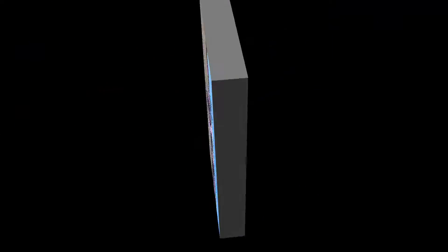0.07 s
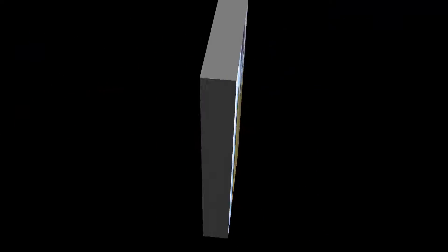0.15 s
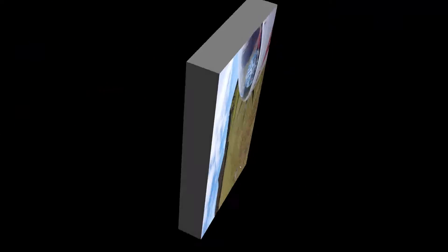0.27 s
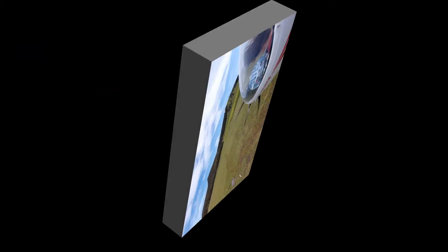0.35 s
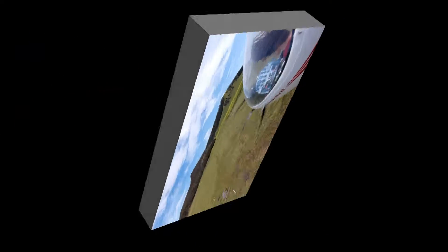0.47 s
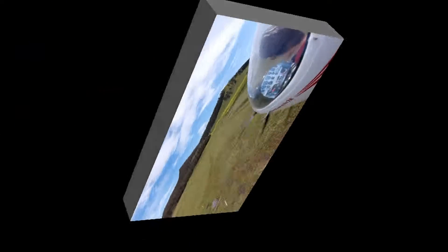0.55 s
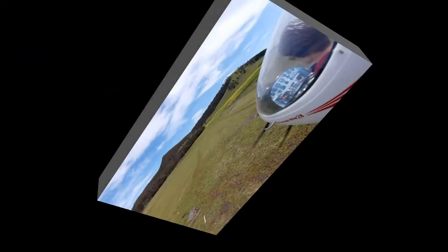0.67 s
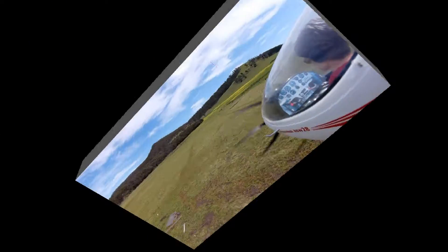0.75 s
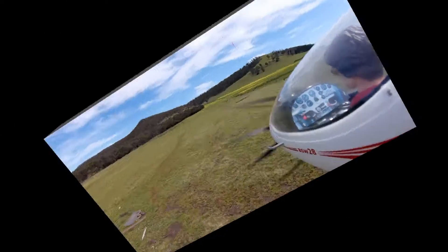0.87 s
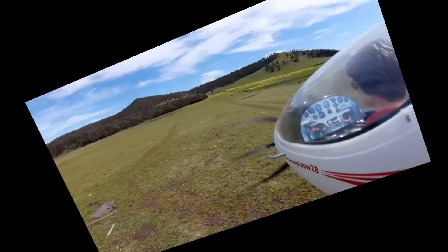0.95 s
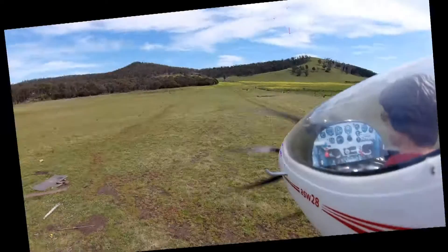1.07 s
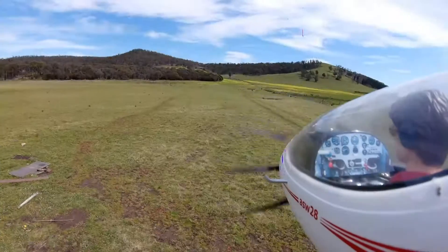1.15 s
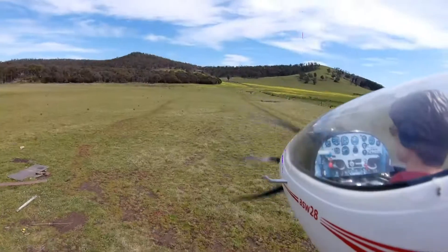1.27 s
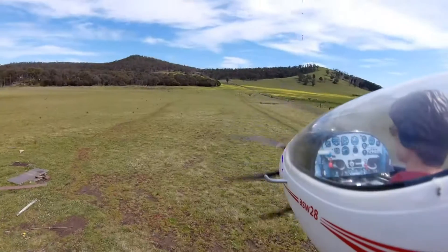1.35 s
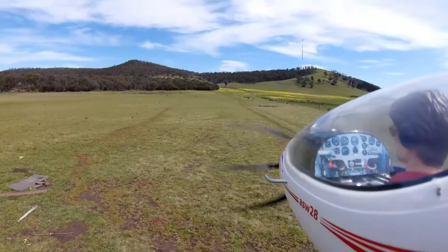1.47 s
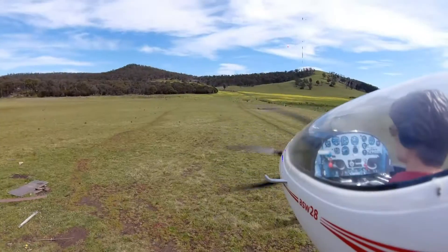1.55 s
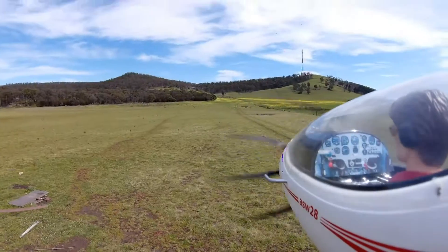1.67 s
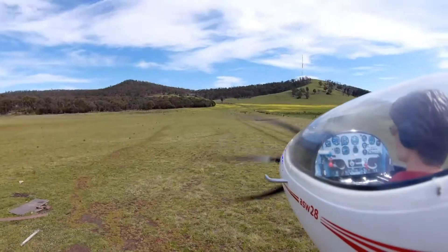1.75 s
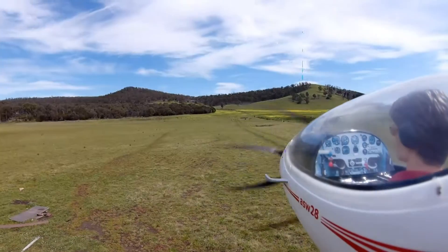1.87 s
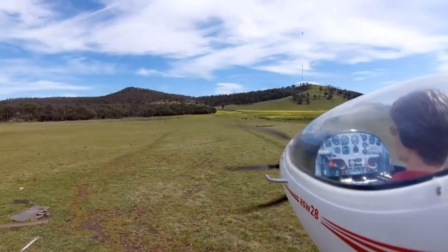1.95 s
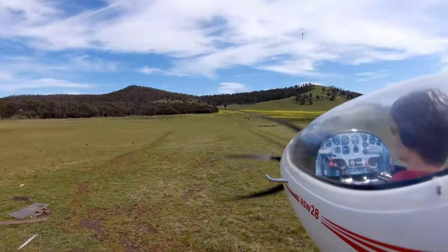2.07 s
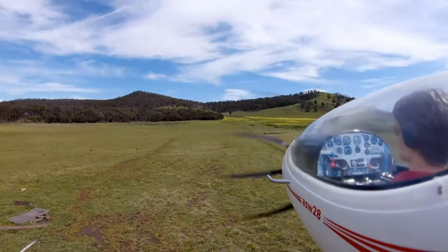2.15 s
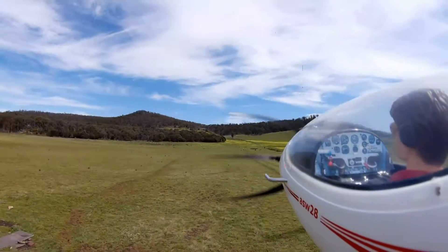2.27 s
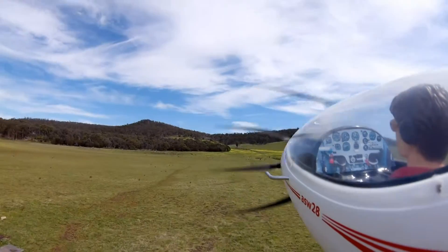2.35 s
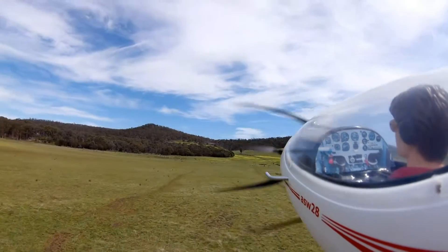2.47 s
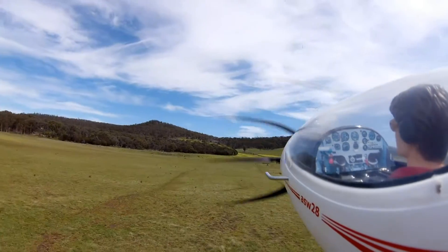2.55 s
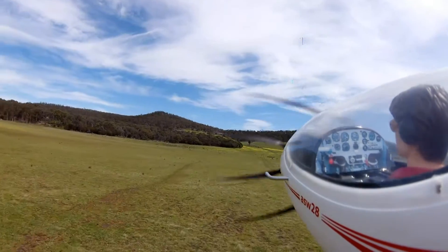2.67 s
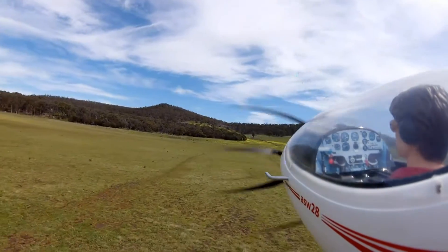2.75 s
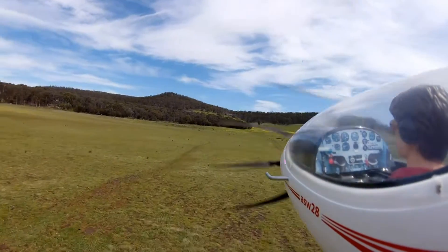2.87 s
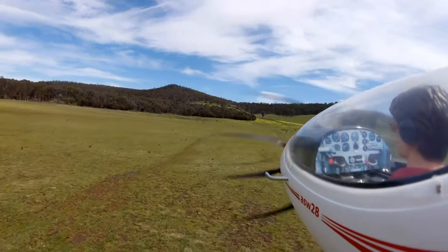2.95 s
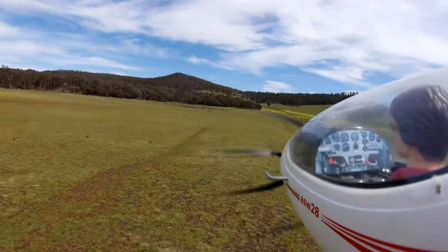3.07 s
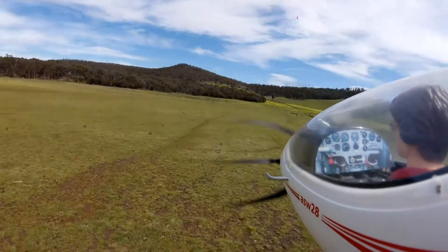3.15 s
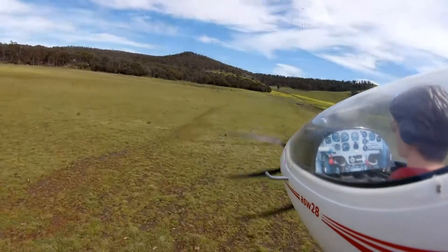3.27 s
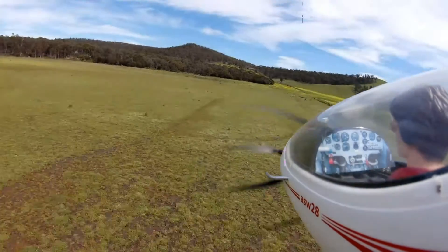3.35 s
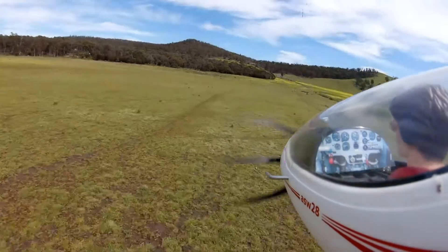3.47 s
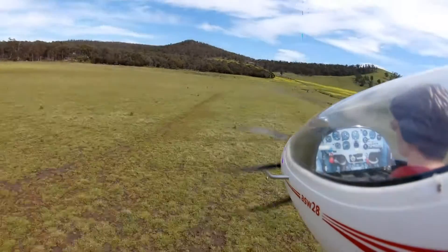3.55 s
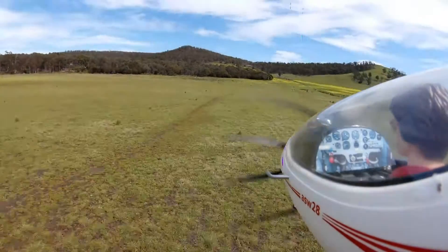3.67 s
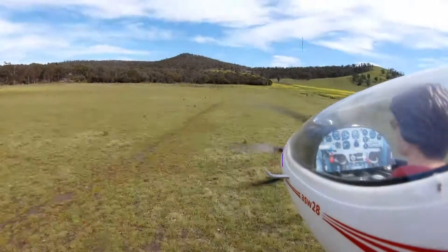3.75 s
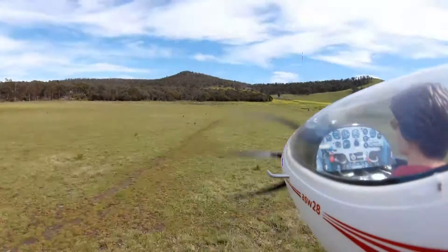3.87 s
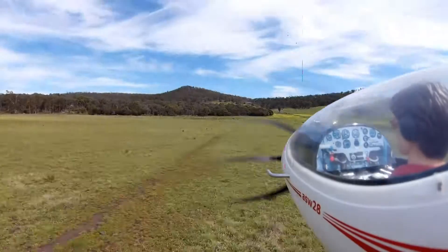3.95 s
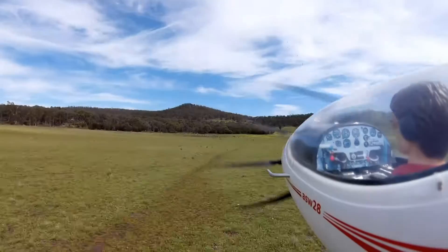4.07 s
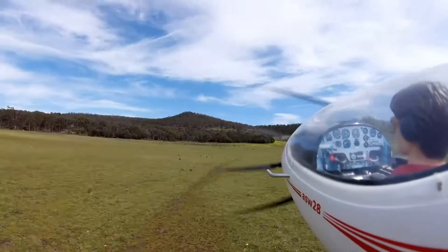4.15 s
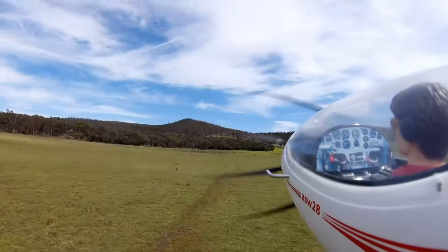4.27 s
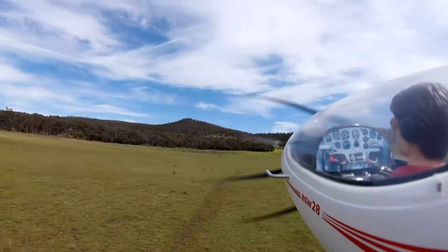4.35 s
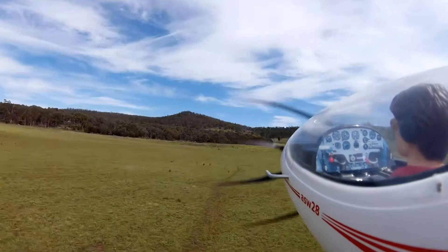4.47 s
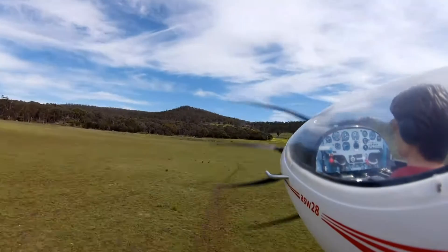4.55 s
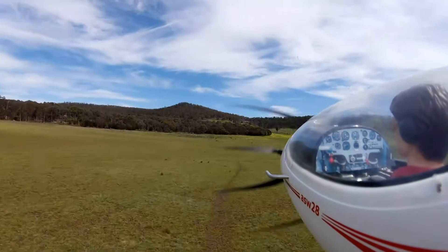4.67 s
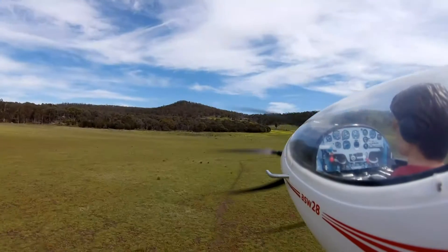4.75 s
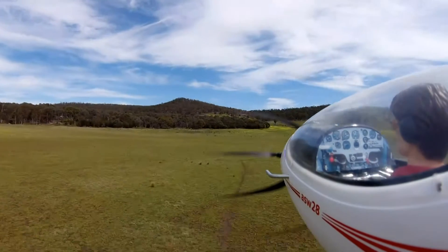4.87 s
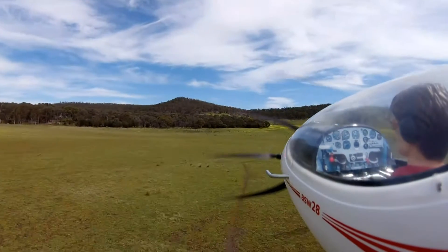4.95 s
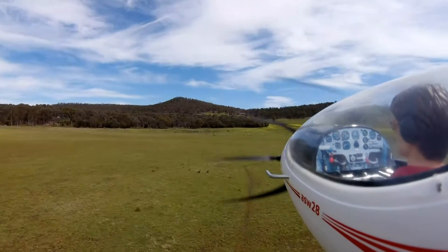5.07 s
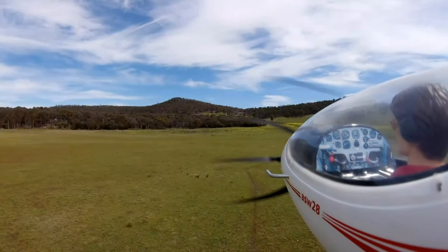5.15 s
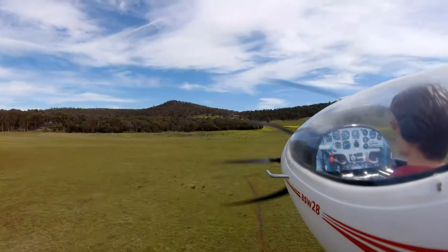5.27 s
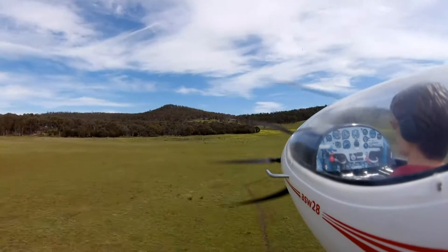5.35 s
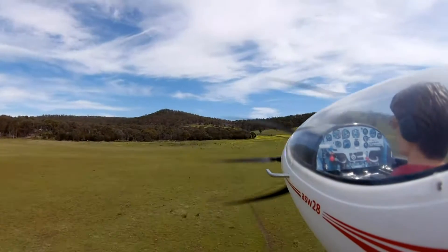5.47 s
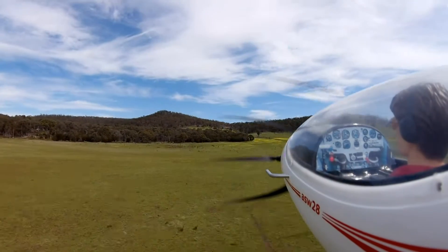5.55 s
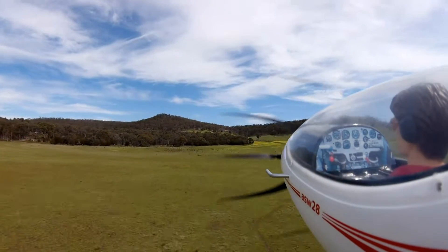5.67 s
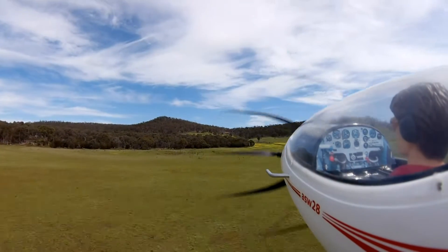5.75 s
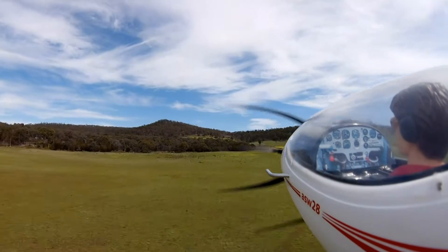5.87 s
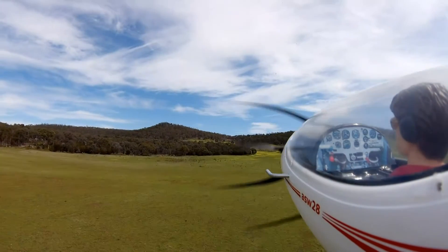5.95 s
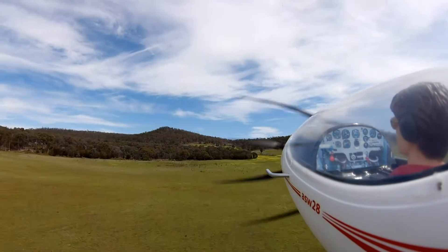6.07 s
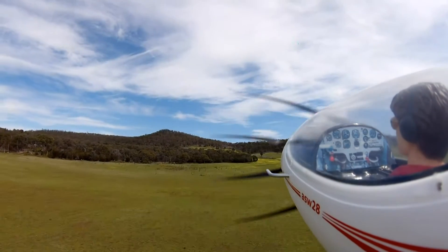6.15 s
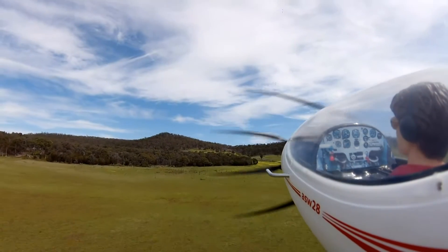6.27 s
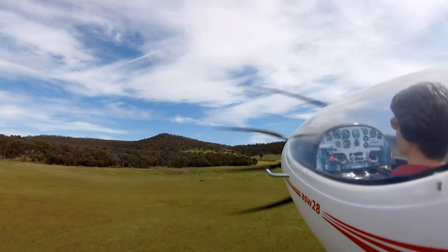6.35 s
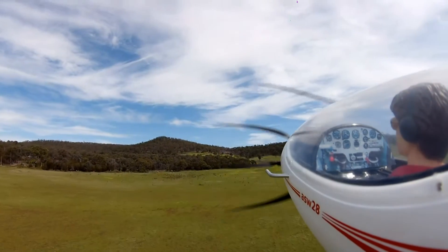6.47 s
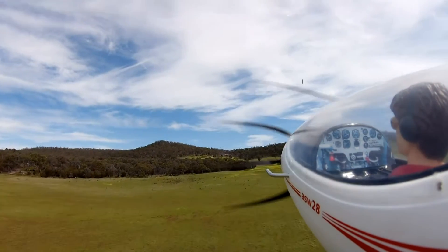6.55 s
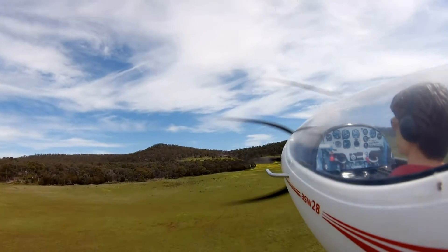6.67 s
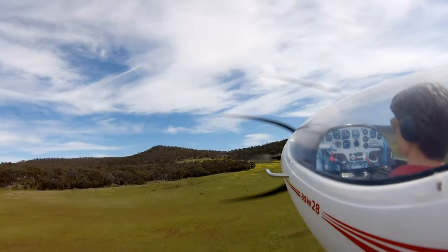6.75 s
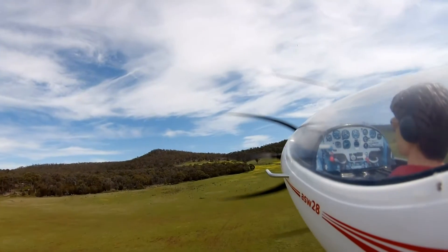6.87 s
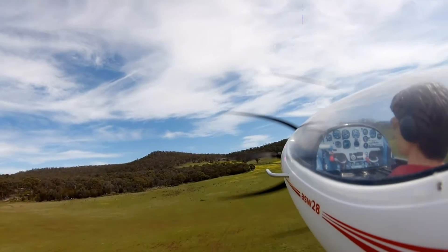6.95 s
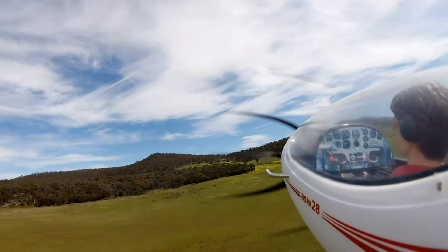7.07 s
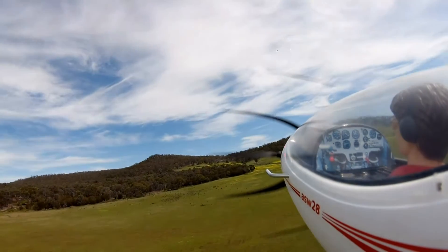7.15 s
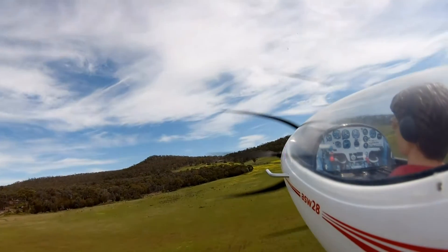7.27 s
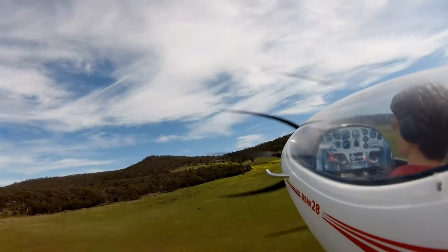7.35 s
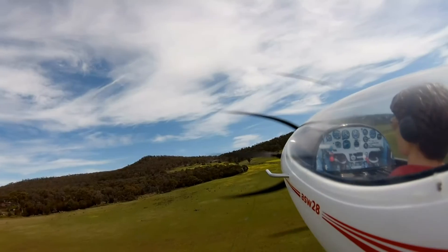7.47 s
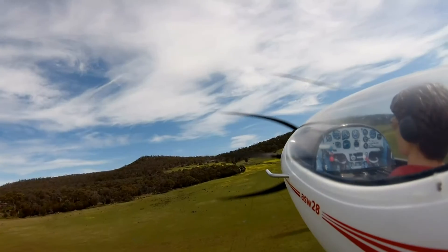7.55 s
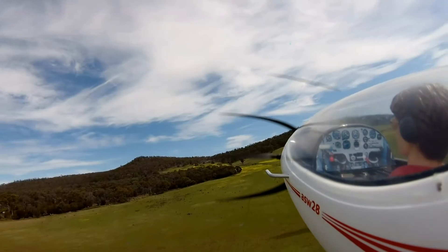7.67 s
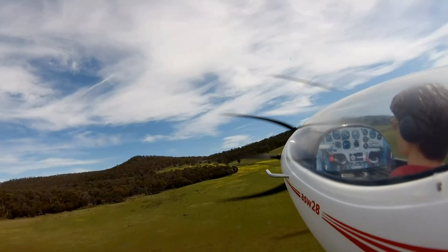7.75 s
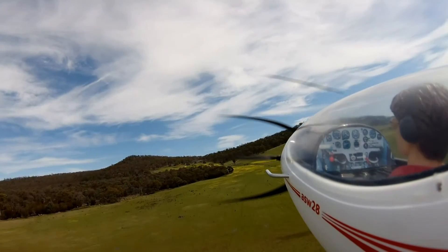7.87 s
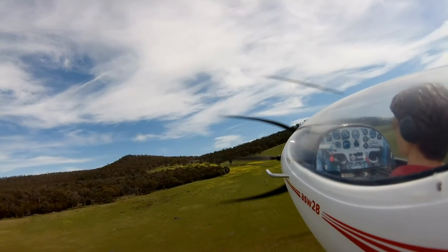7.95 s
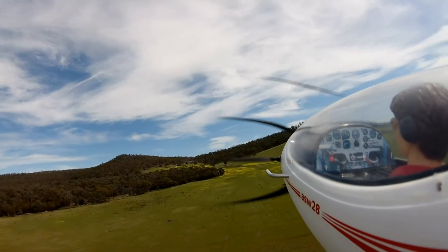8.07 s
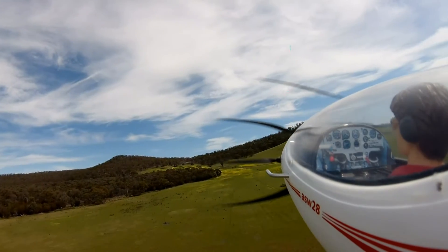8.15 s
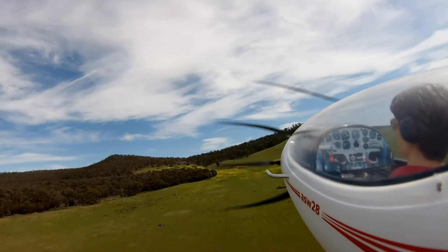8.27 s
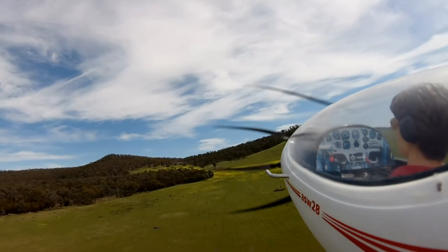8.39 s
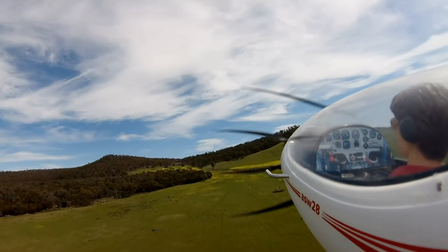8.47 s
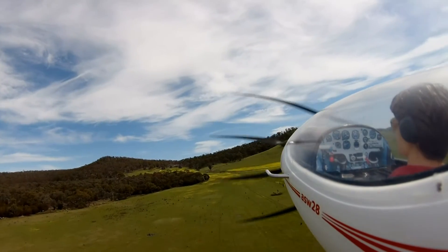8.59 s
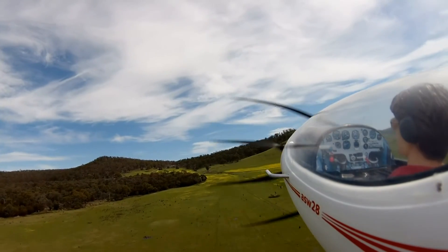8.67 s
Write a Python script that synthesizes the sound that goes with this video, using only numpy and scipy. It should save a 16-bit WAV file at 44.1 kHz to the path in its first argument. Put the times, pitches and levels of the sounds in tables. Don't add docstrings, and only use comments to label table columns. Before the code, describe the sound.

From 0 to about 2.2 seconds, a model glider's electric motor turns while its loose camera mount bounces over grass: fuzzy low hum, fast irregular dull thuds, scattered harder knocks with small snaps, and fine chatter. The pitch rises slightly around 1 second; a tiny click falls near 1.1, and harder knocks cluster around 1.5. At roughly 2.3 to 2.8 a hollow, uneven slapping rattle takes over. From 2.8 the mount seats and the sound becomes a fuller, rough low drone near 150 turns a second, with rapid knocks merging into a raspy midrange buzz. A low wheel jolt comes near 2.95. Muffled air grows until about 4 seconds, then stays behind the motor. The pitch barely moves, but the timbre keeps shifting, with brief dips near 5.6 and 6.85 and hum swells around 6.35, 7.6 and the end. Close, dry and dark; it cuts abruptly at 8.7.

```python
import sys
import numpy as np
from scipy import signal
from scipy.fft import irfft
from scipy.io import wavfile
from scipy.ndimage import uniform_filter1d

SR = 44100
rng = np.random.default_rng(int(sys.argv[2]) if len(sys.argv) > 2 else 0)


def linear_from_db(decibels):
    return 10 ** (np.asarray(decibels, float) / 20)


def waveform_to_disk(signal):
    frames = np.transpose(np.atleast_2d(signal))
    scaled = np.clip(frames, -1, 1) * 32767
    samples = np.round(scaled).astype(np.int16)
    wavfile.write(sys.argv[1], SR, samples)


N = 384552
T = np.arange(N) / SR
LOCK_S = 2.3


def evened(x):
    return x / np.sqrt(np.mean(x ** 2) + 1e-20)


def columns(rows, t):
    s, *values = np.transpose(rows)
    return [np.interp(t, s, v) for v in values]


def held(rows, t):
    s, *values = np.transpose(rows)
    row = np.maximum(np.searchsorted(s, t) - 1, 0)
    return np.array(values)[:, row]


def drift(hz):
    span = int(SR / hz)
    once = uniform_filter1d(rng.standard_normal(N), span)
    return evened(uniform_filter1d(once, span))


def clicks(s, size):
    at = np.clip(s * SR, 0, N - 2)
    first, part = at.astype(int), at % 1
    out = np.bincount(first, size * (1 - part), N)
    return out + np.bincount(first + 1, size * part, N)


def coloured(x, points):
    hz, db = np.transpose(points)
    grid_hz = abs(np.fft.fftfreq(4096, 1 / SR))
    log_gain = np.log(linear_from_db(np.interp(np.log(grid_hz + 1), np.log(hz), db)))
    minimum_phase = np.exp(signal.hilbert(log_gain).conj())
    taps = np.fft.ifft(minimum_phase).real[:2048]
    return signal.oaconvolve(x, taps / np.linalg.norm(taps))[:N]


def compact(x, points, lean):
    hz, db = np.transpose(points)
    grid_hz = np.fft.rfftfreq(2048, 1 / SR)
    gain = linear_from_db(np.interp(np.log(grid_hz + 1), np.log(hz), db))
    taps = np.fft.fftshift(irfft(gain * np.exp(-1j * lean)))
    return signal.oaconvolve(x, taps / np.linalg.norm(taps), "same")


# t/s, shaft f/Hz, bounce level/dB, half-order hum level/dB
RUN_UP = [(0, 139.1, -40, -59), (.55, 139, -39.5, -66), (.85, 139.7, -39.5, -53), (1, 146.3, -40, -58.5),
          (1.4, 147.2, -42, -58), (1.5, 142.5, -42, -59.5), (1.9, 145.7, -38, -55),
          (2.12, 149.5, -35.5, -63), (2.4, 148.8, -45, -98)]
# t/s, shaft f/Hz
SHAFT = [(2.0, 148.8), (2.5, 148.2), (2.9, 148.6), (3.3, 149.3), (3.8, 149.8), (4.3, 149.8), (4.55, 149.1),
         (4.9, 150.2), (5.3, 150.3), (5.8, 151), (6.0, 150.4), (6.65, 150.9), (7.2, 150), (7.8, 150.2),
         (8.2, 149.5), (8.72, 149.4)]


def shaft(hunt_turns=.011):
    hz = np.where(T < SHAFT[0][0], columns(RUN_UP, T)[0], columns(SHAFT, T)[0])
    return hz, np.cumsum(hz) / SR + hunt_turns * drift(15)


SHAFT_HZ, TURNS = shaft()

# start t/s, length t/s, level/dB
FLOATS = [
    (2.697, 0.14, 1.5),
    (5.55, 0.18, -4),
    (6.779, 0.2, -4),
    (6.968, 0.11, -2.5),
]


def floating_db(t):
    leave_s, reseat_s = .013, .03
    dips = []
    for s, length, db in FLOATS:
        apart = np.minimum((t - s) / leave_s, (s + length - t) / reseat_s)
        dips.append(db * np.clip(apart, 0, 1))
    return np.min(dips, axis=0)


# centre t/s, length t/s, level/dB
GUSTS = [
    (2.244, 0.081, 5),
    (5.698, 0.11, 11.5),
    (6.099, 0.23, 7),
    (6.35, 0.27, 15),
    (7.55, 0.098, 12.5),
    (7.769, 0.27, 10.5),
    (8.682, 0.38, 13.5),
]


def gust_db(t):
    return sum(db * np.cos(np.pi * np.clip((t - s) / length, -.5, .5)) for s, length, db in GUSTS)


# t/s, wing flex on order 2 level/dB, body shake on order 4 level/dB
HUM = [(2.0, -43, -33), (2.12, -43, -52), (2.3, -37, -42), (2.34, -58, -42), (2.62, -37, -66),
       (2.75, -51, -43.5), (2.85, -34.5, -38), (3.1, -29.5, -34.5), (3.5, -30, -31.5), (3.85, -30.5, -34),
       (4.08, -29, -48.5), (4.43, -31.5, -42), (4.52, -32, -33.5), (4.92, -36, -35.5), (5.02, -30, -36),
       (5.28, -31, -35), (5.5, -37, -36.5), (5.75, -49.5, -36.5), (5.98, -61, -37.5), (6.05, -43, -34.5),
       (6.47, -48.5, -33.5), (6.55, -41, -36), (6.75, -39.5, -36.5), (7.1, -41.5, -34), (7.2, -45, -38.5),
       (7.32, -47, -35), (8.0, -44.5, -34.5), (8.1, -53.5, -37), (8.25, -49, -39), (8.72, -49, -32)]
# t/s, level/dB
THIRD = [(2.0, -48), (2.05, -43), (2.28, -40), (2.33, -58), (2.72, -53), (2.8, -34.5), (3.35, -39.5),
         (3.61, -60), (3.78, -39.5), (4.15, -49), (4.28, -39), (4.65, -37.5), (5.0, -36), (5.33, -36),
         (5.58, -38.5), (5.72, -43), (6.34, -33), (6.47, -38), (6.9, -37.5), (7.0, -55), (7.09, -33.5),
         (7.36, -38), (7.5, -39), (8.0, -38.5), (8.72, -37.5)]
# t/s, level/dB
FIFTH = [(2.0, -54), (2.8, -47), (3.0, -49), (4.15, -48.5), (4.3, -39.5), (4.55, -39.5), (4.85, -43),
         (5.3, -37.5), (5.5, -53.5), (6.7, -55), (6.85, -39), (7.05, -45), (7.2, -43), (8.72, -41)]
HUM_LEANS = (3, -.6, -.8, 1.9, 1)
# from t/s, order 2 angle/rad
AIRBORNE = (5.45, -1.0)


def hum(waver_db=-0.1, sway_db=1.25, lighten_db=-5, wander_db=1.0):
    fade_in = np.clip((T - HUM[0][0]) / 0.083, 0, 1)
    flex_db, shake_db = columns(HUM, T)
    lift_off_s, rolling_db, flying_db = 3.1, -48, -60
    first_db = np.interp(T, [2.65, lift_off_s, lift_off_s + 0.064],
                         [rolling_db, rolling_db + lighten_db, flying_db])
    third_db = columns(THIRD, T)[0] + wander_db * drift(4.1)
    fifth_db = columns(FIFTH, T)[0] + wander_db * drift(7.1)
    levels = [first_db, flex_db + gust_db(T), third_db, shake_db + floating_db(T), fifth_db]
    airborne_s, airborne_lean = AIRBORNE
    locked = 0
    for k, (db, lean) in enumerate(zip(levels, HUM_LEANS), 1):
        if k == 2:
            lean = lean + airborne_lean * np.clip(10 * (T - airborne_s), 0, 1)
        level = linear_from_db(db + waver_db * drift(45) + sway_db * drift(32))
        angle = 2 * np.pi * k * (TURNS - .66)
        locked = locked + level * np.cos(angle - lean + .2 * drift(54))
    half_level = linear_from_db(columns(RUN_UP, T)[2] - 1.5 + 2.7 * drift(16))
    half = half_level * np.sin(1.05 * np.pi * TURNS + 1.3 * drift(20))
    return np.sqrt(2) * (fade_in * locked + half)


# t/s, back, front and far level/dB
KNOCKS = [(2.81, -37, -55, -51), (2.91, -32.5, -48, -58), (3.16, -47.5, -45.5, -38.5),
          (3.56, -59, -39, -36.5), (3.69, -46, -34, -34.5), (3.88, -49, -42, -34), (3.9, -47, -39, -42),
          (3.93, -47, -35, -35.5), (4.06, -59, -34, -33.5), (4.23, -54, -36.5, -41.5),
          (4.49, -55, -33, -42), (4.55, -53, -34.5, -33.5), (4.65, -44, -37.5, -30.5),
          (4.73, -32.5, -47, -37), (4.87, -44, -32.5, -52), (4.92, -41, -52, -33), (4.95, -48, -33, -43),
          (5.03, -39, -46, -38), (5.16, -45, -37, -35), (5.19, -37.5, -43, -39), (5.32, -54, -33, -50),
          (5.37, -40, -35.5, -35.5), (5.48, -28.5, -51, -38), (5.51, -29, -52, -53), (5.56, -44, -53, -45),
          (5.61, -52, -48, -47), (5.72, -30.5, -42, -34.5), (5.77, -29, -45, -43), (5.93, -29.5, -39, -38),
          (6.01, -56, -35.5, -34.5), (6.28, -46, -30, -36), (6.36, -56, -34, -39.5), (6.49, -34, -42, -43),
          (6.52, -29, -41.5, -37), (6.57, -38.5, -46, -32), (6.62, -29.5, -45, -38), (6.76, -42, -55, -44),
          (6.84, -45, -52, -57), (6.94, -40, -51, -43), (7.07, -30.5, -49, -41), (7.15, -30, -45, -38),
          (7.355, -47, -37, -34), (7.69, -48, -31.5, -35.5), (7.82, -56, -34.5, -34.5),
          (8.03, -47.5, -37, -32), (8.25, -28, -44, -38.5), (8.36, -30.5, -38.5, -33),
          (8.46, -45, -37, -33), (8.54, -51, -32.5, -38.5)]
# from t/s, back, front and far angle/turns
SEATS = [
    (2.8, .65, .73, 1.24),
    (3.56, .66, .77, 1.26),
    (3.9, .64, .69, 1.26),
    (4.5, .655, .745, 1.22),
]
KNOCK_LEANS = (2.0, 1.2, 0)
# from t/s, to t/s, extra scatter level/dB
RESTLESS = (4.5, 5.5, .7)
# f/Hz, level/dB
BACK_COLOUR = [(50, -55), (150, -18), (300, -1), (450, 3), (640, -1), (900, 6), (1250, 5), (1650, -2),
               (1950, -14), (2400, -16), (4500, -46), (9000, -74)]
# f/Hz, level/dB
FRONT_COLOUR = [(300, -47), (480, -29.5), (750, -5), (1050, 6.5), (1350, 6.5), (1650, 1.5), (1950, -9.5),
                (2400, -9.5), (4500, -38), (9000, -72)]
# f/Hz, level/dB
KNOCK_COLOUR = [(300, -43.5), (480, -37), (750, -5.5), (1050, 9), (1350, 4), (1650, -4.5), (1950, -19.5),
                (2400, -18.5), (4500, -49), (9000, -74.5)]


def knocks(flutter_db=0.87, scatter_db=1.0, jitter_turns=.006, creep_turns=.007):
    turn = np.arange(int(np.interp(KNOCKS[0][0], T, TURNS)) + 1, int(TURNS[-1]) - 1)
    at = np.interp(turn, TURNS, T)
    chance = rng.standard_normal((len(turn), 3, 2)).T
    flutter = flutter_db * np.array([np.interp(at, T, drift(17)) for _ in KNOCK_LEANS])
    creep = creep_turns * np.array([np.interp(at, T, drift(34)) for _ in KNOCK_LEANS])
    s = np.interp(turn + held(SEATS, at) + creep + jitter_turns * chance[0], TURNS, T)
    from_s, to_s, extra_db = RESTLESS
    scatter = scatter_db + extra_db * (at > from_s) * (at < to_s)
    size = linear_from_db(held(KNOCKS, at) + flutter + scatter * chance[1])
    colours = (BACK_COLOUR, FRONT_COLOUR, KNOCK_COLOUR)
    contacts = zip(s, size, colours, KNOCK_LEANS)
    total = sum(compact(clicks(when, hit), colour, lean) for when, hit, colour, lean in contacts)
    return np.sqrt(SR / SHAFT_HZ) * total


# t/s, peak level/dB
LANDINGS = [(0.082, -20), (0.157, -26), (0.182, -23), (0.241, -22), (0.285, -23), (0.4, -27), (0.463, -31),
            (0.494, -18), (0.554, -21), (0.716, -30), (0.746, -20), (0.852, -23), (0.879, -23),
            (0.908, -18), (1.022, -21), (1.064, -25), (1.148, -18), (1.204, -28), (1.247, -28),
            (1.272, -25), (1.319, -24), (1.344, -19), (1.469, -15.5), (1.524, -20.5), (1.541, -22.5),
            (1.579, -17.5), (1.621, -16), (1.724, -27), (1.85, -21), (1.863, -19), (1.939, -22),
            (1.965, -21), (2.006, -20), (2.041, -17), (2.169, -18), (2.216, -18.5), (2.256, -17)]
# f/Hz, level/dB
BOUNCE_COLOUR = [(60, -48), (130, -6), (250, 1.5), (400, 6), (650, -1), (1400, -31), (2200, -22),
                 (5000, -44.5)]


def bounces(scatter_db=3.5, jitter_turns=0.173, between_db=-6, soft_db=-1.5, landing_db=12.5, crack_db=-15.0):
    turn = np.arange(2, int(np.interp(RUN_UP[-1][0], T, TURNS)))
    chance = rng.standard_normal((len(turn), 2)).T
    s = np.interp(turn + jitter_turns * chance[0], TURNS, T)
    db = columns(RUN_UP, s)[1] + soft_db + between_db * (turn % 2) + scatter_db * chance[1]
    train = np.sqrt(2 * SR / SHAFT_HZ) * clicks(s, linear_from_db(db))
    hard_s, hard_db = np.transpose(LANDINGS)
    hard = clicks(hard_s + .002, linear_from_db(hard_db + landing_db))
    crack = linear_from_db(crack_db) * compact(hard, KNOCK_COLOUR, np.pi / 4)
    return compact(train + hard, BOUNCE_COLOUR, np.pi / 4) + crack


# t/s, level/dB
RATTLE = [(2.295, -53), (2.315, -31), (2.38, -33.5), (2.45, -31), (2.52, -34), (2.58, -30.5), (2.69, -34),
          (2.73, -31.5), (2.8, -46)]
# f/Hz, level/dB
RATTLE_COLOUR = [(40, -63), (120, -17), (300, 1), (450, 3.5), (650, 1), (1000, -9), (1600, -17.5),
                 (2500, -36), (5000, -43)]


def rattle(scatter_db=3.5, jitter_turns=.022, slap_turns=.32):
    turn = np.arange(*np.interp([RATTLE[0][0], RATTLE[-1][0]], T, TURNS).astype(int))
    chance = rng.standard_normal((len(turn), 2)).T
    s = np.interp(turn + slap_turns + jitter_turns * chance[0], TURNS, T)
    train = clicks(s, linear_from_db(columns(RATTLE, s)[0] + scatter_db * np.tanh(chance[1])))
    return np.sqrt(SR / SHAFT_HZ) * compact(train, RATTLE_COLOUR, np.pi)


# shaft order, level/dB
IDLE = [(1.5, -46.5), (2, -41)]


def idle(wobble=0.89, waver_db=-0.5):
    fade_out = np.clip((HUM[0][0] + 0.11 - T) / 0.091, 0, 1)
    tones = 0
    for k, db in IDLE:
        level = linear_from_db(db + waver_db * drift(6.9))
        tones = tones + level * np.cos(2 * np.pi * k * TURNS + wobble * drift(30))
    return fade_out * tones


# t/s, level/dB
SHAKE = [(0, -45.5), (1.9, -42), (2.3, -42.5), (2.325, -39), (2.42, -38), (2.52, -37.5), (2.6, -38.5),
         (2.75, -39), (2.9, -36), (3.8, -38.5), (4.3, -41.5), (4.95, -36), (5.4, -39.5), (6.1, -42),
         (7.4, -43.5), (8.72, -42.5)]
# f/Hz, level/dB
CHATTER_COLOUR = [(60, -43), (120, -15.5), (220, -6), (400, 0.5), (800, 3), (1500, -1), (2000, -14),
                  (3000, -22), (5000, -37), (9000, -54)]


def chatter(per_s=1500., spread_db=2.0, lift_db=5.0, surge_db=0.95):
    free = T < LOCK_S
    rattling = (T > LOCK_S) & (T < KNOCKS[0][0])
    bunches = np.select([free, rattling], [.5, 1], 2)
    tight = np.select([free, rattling], [.45, 2], 1.2)
    angle = 2 * np.pi * (TURNS - SEATS[0][2])
    odds = per_s / SR * np.exp(tight * np.cos(bunches * angle)) / np.i0(tight)
    sign = np.sign(rng.random(N) - np.where(rattling, .75, .5))
    size = linear_from_db(spread_db * np.minimum(rng.exponential(1, N), 5)) * sign
    ticks = evened(size * (rng.random(N) < odds))
    db = columns(SHAKE, T)[0] + .48 * floating_db(T) + 0.19 * gust_db(T) + surge_db * drift(13.0)
    return coloured(ticks * linear_from_db(db + lift_db + 0.41 * drift(60)), CHATTER_COLOUR)


# t/s, level/dB, f/Hz, sharpness per s
BUMP = (2.9445, -35.5, 75, 170)


def bump():
    s, db, hz, sharp = BUMP
    return -linear_from_db(db) * np.exp(-(sharp * (T - s)) ** 2) * np.cos(2 * np.pi * hz * (T - s))


# t/s, level/dB
WASH = [(0, -60.5), (2.6, -58), (2.9, -56), (4.1, -50), (4.9, -51.5), (8.72, -51.5)]
# f/Hz, level/dB
AIR_COLOUR = [(80, -30.5), (200, 12.5), (500, 19), (1400, 12), (2000, 7), (3000, -1), (4800, -6.5),
              (9000, -7.5)]


def air(lift_db=13.0, flicker_db=0.55):
    db = columns(WASH, T)[0] + 0.048 * gust_db(T) + 0.34 * floating_db(T)
    level = linear_from_db(db + lift_db + flicker_db * drift(30))
    return coloured(level * rng.standard_normal(N), AIR_COLOUR)


def scene():
    motor = hum() + idle()
    mount = knocks() + bounces() + rattle()
    return (motor + mount + chatter() + bump() + air())[None]


def top_cut(x):
    return signal.sosfilt(signal.butter(12, 15800, fs=SR, output="sos"), x)


# f/Hz, level/dB
CAMERA = [(4800, 1), (5400, -11.5), (6000, -15), (6500, -36), (7000, -25.5), (7500, -39), (7900, -24),
          (8600, -25), (9500, -27), (10500, -43.5), (12000, -40), (16000, -53.5)]
# t/s, level/dB, settling rate per s
SPLICE = (1.12985, -31, 1208)


def record(dry):
    hz = np.linspace(0, SR / 2, 1025)
    low_pass = signal.firwin2(1023, hz, linear_from_db(np.interp(hz, *np.transpose(CAMERA))), fs=SR)
    x = signal.oaconvolve(dry, low_pass[None], "same")
    notch_hz, notch_width_hz, low_cut_hz = 693.4, 33, 55
    x = signal.lfilter(*signal.iirnotch(notch_hz, notch_hz / notch_width_hz, SR), x)
    x = signal.sosfilt(signal.butter(2, low_cut_hz, "high", fs=SR, output="sos"), x)
    s, db, rate = SPLICE
    x = x + linear_from_db(db) * (T > s) * np.exp(-rate * abs(T - s))
    end_s = .0006
    x = x * np.minimum((T[-1] - T) / end_s, 1) + linear_from_db(-95.5) * rng.standard_normal(N)
    return top_cut(x)


dry = scene()
out = record(dry)
waveform_to_disk(out)
```